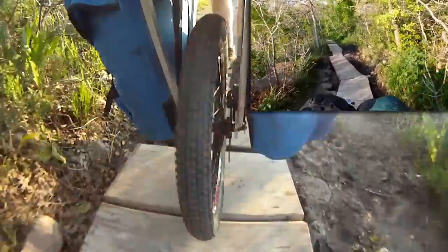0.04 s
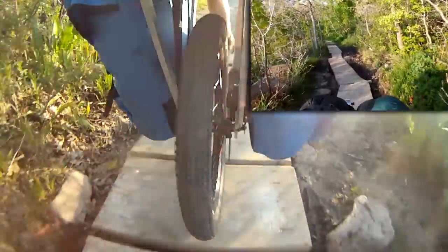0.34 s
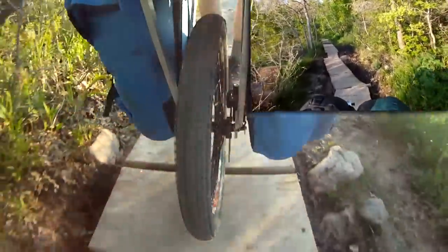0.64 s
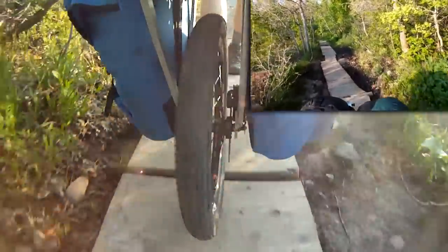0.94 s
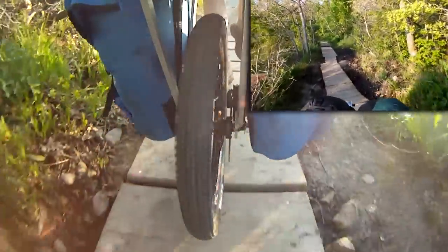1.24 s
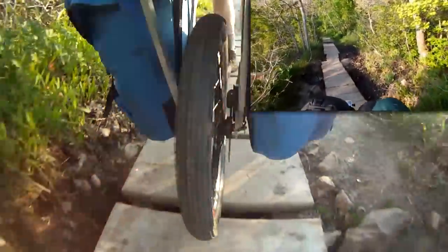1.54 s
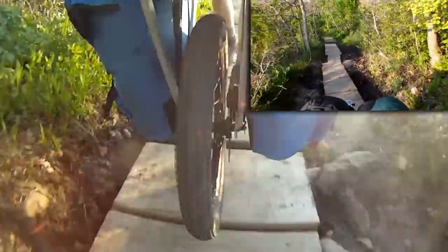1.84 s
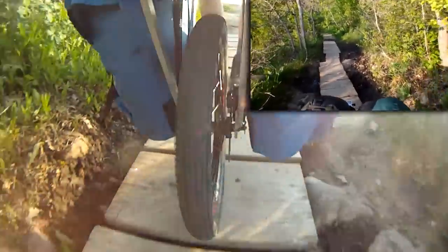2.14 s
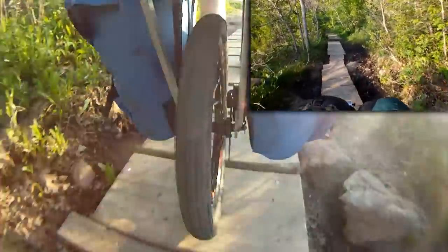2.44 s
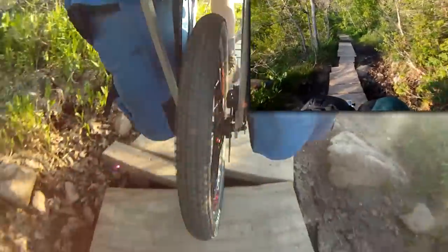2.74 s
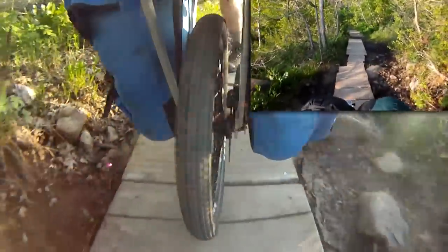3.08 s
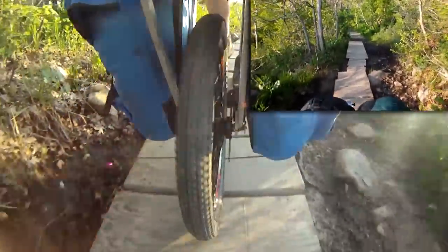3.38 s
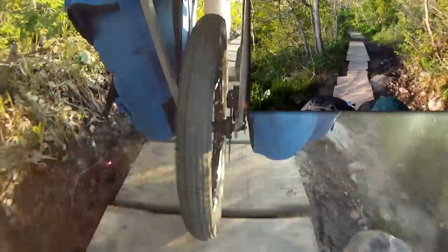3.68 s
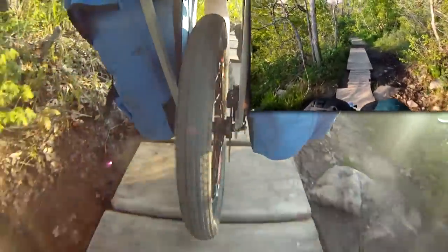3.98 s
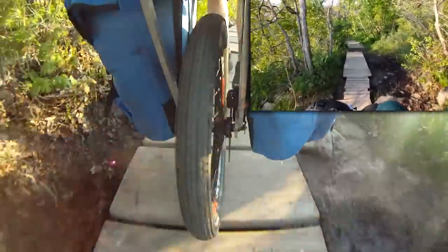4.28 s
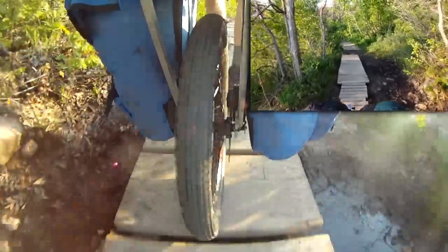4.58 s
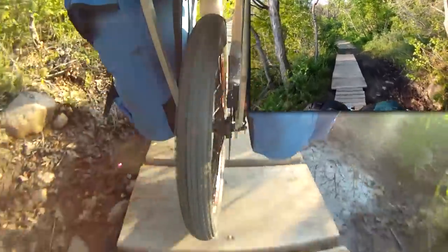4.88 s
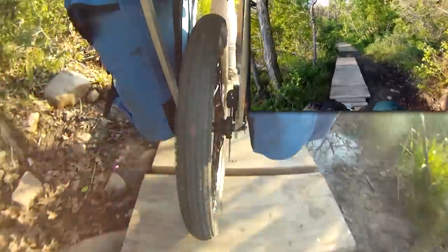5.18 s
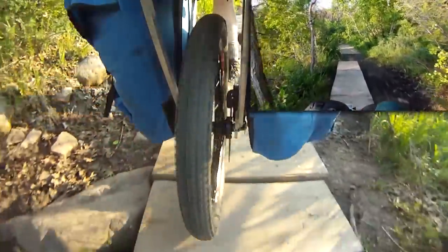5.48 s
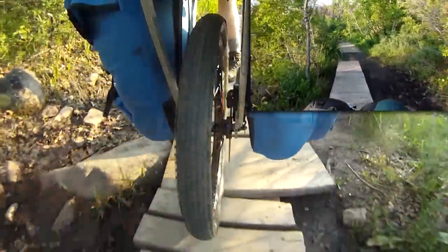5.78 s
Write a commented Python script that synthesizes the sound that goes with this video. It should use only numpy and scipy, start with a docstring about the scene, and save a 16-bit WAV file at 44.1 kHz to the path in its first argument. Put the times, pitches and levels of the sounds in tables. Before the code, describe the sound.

Close, irregular wooden thuds and loose-board clacks under a rolling cart wheel, over low wind rumble and faint birdsong in the woods.

```python
"""A loaded one-wheeled cart on a plank boardwalk in the woods, the microphone riding on its frame.
From the start air buffets the microphone and songbirds whistle over the hush of the forest. Close by,
with every stride, the deck rumbles, planks thud, grit ticks and the bags sway; now and then a loose
board clacks. From 2.4 to 4.7 s a bird trills farther off to the right. At 5.3 s comes the hardest
clack, and the cart rolls on."""
import sys
import numpy as np
from scipy import signal
from scipy.fft import rfft, irfft
from scipy.io import wavfile

SR = 44100
rng = np.random.default_rng(int(sys.argv[2]) if len(sys.argv) > 2 else 0)


def generate_wav(signal):
    """Clip the signal to [-1, 1] and save it as 16-bit WAV at the path in sys.argv[1]."""
    frames = np.transpose(np.atleast_2d(signal))
    scaled = np.clip(frames, -1, 1) * 32767
    pcm = np.round(scaled).astype(np.int16)
    wavfile.write(sys.argv[1], SR, pcm)


N = 265482
TIME = np.arange(N) / SR
BLOW = TIME[:SR // 3]  # time since a contact [s]

# each stride loads the deck and rocks the bags: (time [s], deck rumble [dB], bag rustle [dB])
STRIDES = [(.34, -54, -68), (1.121, -48, -60), (1.841, -52.5, -63.5), (2.62, -52, -72), (3.1, -52, -60.5),
           (3.94, -50.5, -64.5), (4.55, -51, -72), (5.33, -57, -65), (5.96, -51, -76)]
# rumble of the deck under the tyre: (frequency [Hz], level [dB])
DECK_SPECTRUM = [(50, 6.5), (95, 5.5), (230, 11.5), (450, 1.5), (700, -13), (1200, -17), (3000, -43)]
# a scrape on the boards: (frequency [Hz], level [dB])
SCRAPE_SPECTRUM = [(200, -8), (500, 6.5), (1000, 1), (1700, 2.5), (2700, -3), (3450, -8.5), (4300, -13.5),
                   (9000, -18.5)]
# likeness of left and right close to the microphone: (frequency [Hz], correlation [-1..1])
CART_LIKENESS = [(100, 0.55), (400, 0.71), (2000, 0.9), (5000, 0.52), (14000, 0.46)]


def plank_thuds(contact_hz=950, bumps_per_s=7, bump_hz=252, bump_t60=.037, gain_db=1):
    """Just below the microphone the tyre jolts a plank, which swings and rings; the deck shudders on."""
    # heavy dull blows: (time [s], level [dB], thud [Hz], t60 [s], jolt and ring against the thud [dB])
    blows = [(.342, -30.5, 449, 0.1, 3), (.425, -30, 217, 0.019, -4.5), (0.489, -25.5, 405, 0.017, -1),
             (1.124, -35, 168, .05, 9), (1.179, -35.5, 272, 0.082, -4), (1.226, -30, 257, 0.031, -5),
             (1.842, -26, 512, 0.035, 3), (1.946, -31.5, 239, 0.055, -7), (1.999, -21, 178, 0.033, -34),
             (2.033, -31.5, 410, 0.027, 8.5), (2.566, -39.5, 220, 0.023, -2),
             (2.6443, -30.5, 263.4, 0.12, 3), (2.773, -33.5, 250, .028, -5), (2.8469, -34, 395, 0.051, 5),
             (3.005, -40.5, 324, 0.024, -6), (3.174, -34, 288, 0.032, 1.5), (3.2008, -32.5, 265, 0.025, -1),
             (3.278, -26.5, 262, 0.022, -8), (3.8478, -39.5, 330, 0.03, -5),
             (3.9231, -25.5, 453, 0.075, -0.5), (3.9305, -29.5, 364, .02, -11),
             (3.9997, -31, 430, 0.025, 0), (4.062, -31, 435, 0.026, 1.5), (4.082, -38, 240, .04, -16),
             (4.5, -41, 324, 0.047, -8), (4.569, -29, 236, .032, -2.5), (4.7084, -30.5, 465, 0.057, 3.5),
             (4.839, -41, 336, 0.017, -4), (4.972, -37, 258, 0.034, 12), (5.314, -28.5, 490, 0.018, 1.5),
             (5.345, -22, 554, 0.026, -23), (5.417, -33.5, 403, 0.067, 3.5), (5.436, -34.5, 240, 0.037, -5),
             (5.622, -43, 370, 0.025, 2)]
    # modes of a plank resting on its sleepers: (frequency [Hz], level [dB], t60 [s])
    plank_modes = [(136, 8.5, 0.061), (189.2, 1, 0.15), (237.7, 0.5, 0.11), (322, -8.5, 0.19),
                   (369, -3, 0.052), (471.3, -1.5, 0.16), (536, -2, 0.075), (642, -15, 0.059),
                   (730, -14, 0.098), (1130, -17, 0.073)]
    bumps = [(s, db, bump_hz * 2 ** rng.uniform(-.46, .39), bump_t60, -3)
             for s, db in by_chance(bumps_per_s, db=-47.5, spread_db=1.5)]
    jolt = from_db(-6) * knock(hz=620, cycles=6.3, rise_s=.00087)
    out = np.zeros((2, N))
    for s, db, hz, t60, ring_db in blows + bumps:
        plank = jolt + peak_one(soften(ring(plank_modes, scatter_db=2.5, width=.33), contact_hz))
        thud = knock(hz, cycles=t60 * hz, rise_s=.8 / hz)
        shudder = soften(contact_noise(DECK_SPECTRUM) * dying(t60=.32), contact_hz)
        blow = from_db(ring_db) * plank + thud + from_db(-24) * shudder
        add(out, s, -from_db(db + gain_db) * peak_one(blow))
    return out * pan(left_db=-4.5)


def board_clacks(crack_t60=.047, rebound_s=.0035, trees_t60=.35):
    """Wood meets wood close by: a crack, a duller rebound, the board's ring, a faint echo off the trees."""
    # hard clacks of loose boards and the load:
    # (time [s], level [dB], knock [Hz], crack against the ring [dB], share of free ringing time [0..1])
    slaps = [(0.45, -38.5, 1900, -10, .54), (.491, -46, 695, -14, .4), (.517, -38.5, 1620, 3, .43),
             (.868, -42.5, 2050, -8, 0.34), (1.146, -37, 1490, 13, 0.53), (1.182, -40.5, 1490, 18, 1),
             (1.84, -42, 1110, -10, 0.47), (2.036, -36.5, 1770, 8, 1), (2.3443, -42, 1710, 6, 0.55),
             (2.677, -29, 1530, -3, 0.26), (2.773, -24, 1040, -0.5, 0.52), (2.906, -45, 1290, 7, .9),
             (3.278, -32, 1420, -18, 0.51), (4.512, -41.5, 1590, -16, 0.89), (4.666, -36, 1480, -5, 0.73),
             (4.705, -40, 1310, -13, 0.47), (4.904, -42, 1200, -10, 0.45), (5.211, -35, 1980, -14, 0.78),
             (5.3446, -14, 758, -2, 0.72)]
    # modes of a loose board: (frequency [Hz], level [dB], t60 [s])
    board_modes = [(259, -11, 0.15), (326, 9.5, 0.11), (455, 6, 0.042), (602, 1, 0.22), (655, -5, 0.22),
                   (830, 2, 0.085), (930, -18, 0.18), (1140, 6, 0.086), (1368, -3, 0.14), (1530, 0, 0.1),
                   (1740, -22, 0.042), (1730, 1.5, 0.088), (2080, 0.5, 0.12), (2546, -0.5, 0.073),
                   (3020, 4, 0.023), (3120, -31, 0.28), (3220, -13, 0.16)]
    # the crack of the contact: (frequency [Hz], level [dB])
    crack_spectrum = [(300, 0), (700, 0), (2200, 2.5), (3500, -6.5), (4800, -13), (7000, -19), (11000, -44),
                      (16000, -67)]
    echo = from_db(-32) * dying(trees_t60)
    out = np.zeros((2, N))
    for s, db, hz, crack_db, freedom in slaps:
        decay = dying(crack_t60 * freedom)
        board = peak_one(ring(board_modes, scatter_db=1, width=.15, freedom=freedom))
        crack = peak_one(contact_noise(crack_spectrum) * (decay + echo))
        rebound = peak_one(contact_noise(SCRAPE_SPECTRUM) * decay)
        blow = board + from_db(crack_db) * crack + from_db(-4) * knock(hz, cycles=11, rise_s=.0012)
        add(out, s, from_db(db) * peak_one(blow))
        # the looser the board, the harder it rebounds
        add(out, s + rebound_s, from_db(db - 4) * freedom ** 2 * rebound)
    return out * pan(left_db=-4)


def rolling_tyre():
    """With each stride the tyre drums on the wood's grain and scrapes a little, near and to the right."""
    # short scrapes: (middle [s], length [s], level [dB], rasp against the scrape [dB])
    scrapes = [(0.472, 0.093, -54, -16), (2.664, 0.024, -52, -16), (2.917, 0.034, -48, -22),
               (3.103, 0.06, -60, -25), (3.334, .049, -56, -29), (4.016, 0.27, -61, -23),
               (4.753, 0.086, -61.5, -20), (5.332, 0.0093, -48, -22), (5.611, 0.02, -50.5, -25),
               (5.942, 0.058, -47.5, -4)]
    # the dry rasp of a scrape: (frequency [Hz], level [dB])
    rasp_spectrum = [(200, -42), (2800, -25), (3450, 2), (4100, -23), (9000, -38)]
    load = sum(from_db(db) * stride(s) for s, db, _ in STRIDES)
    scraping = from_db(-17) * load + strokes((s, length, db) for s, length, db, _ in scrapes)
    rasping = strokes((s, length, db + rasp_db) for s, length, db, rasp_db in scrapes)
    rumble = from_db(-2) * load * rubbing(DECK_SPECTRUM, grain_db=5.5, grains_per_s=70)
    scrape = scraping * rubbing(SCRAPE_SPECTRUM, grain_db=4, grains_per_s=320)
    rasp = rasping * rubbing(rasp_spectrum, grain_db=5, grains_per_s=350)
    return rumble * pan(left_db=-5.5) + (scrape + rasp) * pan(left_db=-3.5)


def grit_ticks(crumbs_per_s=10, gain_db=1):
    """A grain of grit snaps under the tyre and its crumbs scatter."""
    # the larger grains: (time [s], level [dB])
    grains = [(.424, -44.5), (.5172, -35), (.6928, -43), (1.1812, -34), (2.0792, -39.5), (2.236, -43),
              (2.3441, -34.5), (2.7726, -25.5), (2.8833, -37), (2.9032, -34), (2.9732, -49), (3.1053, -37),
              (3.2223, -37.5), (3.29, -37), (3.5962, -43), (4.169, -39.5), (4.6658, -36.5), (5.2121, -37),
              (5.3444, -26.5)]
    # the snap of a grain: (frequency [Hz], level [dB])
    snap_spectrum = [(400, 1), (1200, 3), (2500, -10.5), (4500, -8), (7000, -6), (11000, -8.5),
                     (16000, -14)]
    decay = dying(t60=.018) + from_db(-18) * dying(t60=.16)
    out = np.zeros((2, N))
    for s, db in [*grains, *by_chance(crumbs_per_s, db=-48.5, spread_db=1)]:
        snap = contact_noise(snap_spectrum) * decay
        add(out, s, from_db(db + gain_db) * peak_one(snap))
    return out * pan(left_db=-1.5)


def bag_rustle(crumple_db=3.5, gain_db=-2.5):
    """Beside the microphone the bags sway with each stride; their fabric rubs and crumples."""
    # the bags slip on the frame: (middle [s], length [s], level [dB])
    slips = [(1.338, 0.014, -53), (1.758, 0.027, -53), (1.915, 0.021, -54.5), (1.97, .025, -56),
             (2.95, 0.14, -54), (3.035, 0.077, -49.5), (3.11, 0.042, -46.5), (3.172, 0.03, -48),
             (4.738, 0.018, -56), (5.352, 0.024, -49), (5.63, 0.14, -68), (5.94, 0.045, -53.5)]
    # rubbing fabric: (frequency [Hz], level [dB])
    fabric_spectrum = [(700, 5.5), (2000, 1), (4000, -4.5), (7000, -1.5), (10500, -1), (13000, -8),
                       (16000, -14)]
    sway = sum(from_db(db) * stride(s) for s, _, db in STRIDES)
    crumple = from_db(crumple_db * np.clip(drift(per_s=45), -2, 2))
    fabric = rubbing(fabric_spectrum, grain_db=3.5, grains_per_s=970)
    return from_db(gain_db) * (sway + strokes(slips)) * crumple * fabric * pan(left_db=.5)


def wind_buffet(gust_db=1, veer_db=1.5, gain_db=6):
    """The breeze buffets the microphone in gusts and veers from side to side."""
    # strength of the air on the microphone: (time [s], level [dB])
    breeze = [(0, -36), (.2, -39.5), (.5, -32.5), (.8, -36.5), (1.05, -38), (1.35, -31.5), (1.6, -38.5),
              (1.9, -34), (2.35, -40), (2.7, -34.5), (3.0, -30.5), (3.45, -38), (3.7, -43), (4.25, -39),
              (4.8, -41), (5.6, -36), (6.0, -39.5)]
    # the low buffeting: (frequency [Hz], level [dB])
    spectrum = [(2, -28), (5.5, 5.5), (10, 4.5), (21, -5), (30, -13.5), (43, -6), (60, -18.5), (100, -26),
                (160, -42.5), (300, -62), (700, -100)]
    # likeness of left and right: (frequency [Hz], correlation [-1..1])
    likeness = [(10, -0.28), (50, -1), (120, -0.066), (400, -0.12)]
    gusts = from_db(gust_db * drift(per_s=7))
    veer = from_db(veer_db * drift(per_s=3) * np.array([[1], [-1]]) / 2)
    return from_db(gain_db) * level(breeze) * gusts * veer * noise(spectrum, likeness) * pan(left_db=-3)


def songbirds(glide_at_middle=.62, waver_per_glide=.157, gain_db=-6):
    """Birds whistle phrases in the trees ahead, rougher where they slur."""
    # whistled notes: (time [s], length [s], start pitch [Hz], end pitch [Hz], level [dB])
    notes = [(0.169, 0.023, 2300, 2420, -54.5), (0.258, .06, 3050, 3600, -63), (.66, 0.06, 2350, 2950, -61),
             (.72, 0.045, 2800, 3620, -61), (0.903, .05, 3420, 3640, -63), (0.944, 0.12, 2930, 3510, -61),
             (1.208, .04, 3420, 3740, -59), (1.529, 0.071, 3080, 3570, -60),
             (1.688, 0.126, 3074, 3030, -63.5), (1.81, 0.063, 3030, 2960, -58.5),
             (2.1, 0.12, 2890, 2824, -58.5), (4.797, 0.1, 3510, 3450, -63.5), (4.919, .1, 3440, 3354, -61),
             (5.162, 0.057, 3690, 3450, -62), (5.21, 0.06, 3160, 2840, -58.5),
             (5.39, 0.066, 3190, 3090, -53), (5.765, 0.053, 2930, 3060, -60)]
    song = np.zeros((2, N))
    for s, length, start_hz, end_hz, db in notes:
        pitches = [start_hz, start_hz + glide_at_middle * (end_hz - start_hz), end_hz]
        waver = .0022 + waver_per_glide * np.ptp(pitches) / np.mean(pitches)
        add(song, s, from_db(db + gain_db) * whistle(length, pitches, waver, flutter_db=-1))
    return woods(song, t60=.31, direct_db=-1)


def trilling_bird(span_s=(2.447, 4.66), period_s=.0485, sweep_s=.031, sweep_hz=(3500, 4750, 5950)):
    """Farther off to the right one bird trills in quick upward sweeps, no two alike."""
    # loudness of the trill: (time [s], level [dB])
    loudness = [(2.4, -73), (2.65, -63), (3.0, -58.5), (3.55, -57.5), (3.9, -59), (4.2, -63.5),
                (4.47, -58.5), (4.62, -61), (4.68, -70)]
    trill = np.zeros((2, N))
    for s in np.arange(*span_s, period_s):
        pitches = np.array(sweep_hz) * (1 + .02 * rng.standard_normal(3))
        add(trill, s, whistle(sweep_s, pitches, waver=.03, flutter_db=2))
    trill *= from_db(-4) * level(loudness) * pan(left_db=-6)
    return woods(trill, t60=.12, direct_db=-9)


def forest_hush(gain_db=-57.5):
    """The steady hush of the forest, far off and all around."""
    # colour of the hush: (frequency [Hz], level [dB])
    spectrum = [(88, -60), (150, -5), (254, -1.5), (587, -9.5), (2120, -13.5), (4450, -22), (10300, -25.5),
                (14900, -32.5), (15800, -33)]
    # likeness of left and right: (frequency [Hz], correlation [-1..1])
    likeness = [(130, 0.95), (300, 0.46), (700, 0.61), (1500, 0.75), (3100, 0.66), (6500, 0.26),
                (15000, 0.03)]
    return from_db(gain_db) * noise(spectrum, likeness) * pan(left_db=.6)


def stride(s, attack_s=.07, hold_s=.2, release_db_per_s=45):
    """Gain over one stride: weight comes on, stays, and is taken off."""
    rise = np.clip((TIME - s) / attack_s + 1, 0, 1)
    return rise * from_db(-release_db_per_s * np.maximum(TIME - s - hold_s, 0))


def by_chance(per_s, db, spread_db):
    """(time [s], level [dB]) of small contacts, crowding where the strides put weight on the deck."""
    weight = np.cumsum(np.sqrt(sum(stride(s) for s, *_ in STRIDES)))
    count = int(per_s * N / SR)
    place, size = rng.random((count, 2)).T
    times = np.interp((np.arange(count) + place) / count, weight / weight[-1], TIME)
    return zip(times, db + spread_db * (2 * size - 1))


def ring(modes, scatter_db, width, freedom=1):
    """Each blow lands elsewhere, so modes vary in strength, sign and direction; weight damps the wood."""
    out = 0
    for hz, db, t60 in modes:
        strength, detune, skew = rng.standard_normal(3)
        phase = 2 * np.pi * hz * (1 + .021 * detune) * BLOW + width * skew * np.array([[1], [-1]])
        gain = rng.choice([-1, 1]) * from_db(db + scatter_db * strength)
        out = out + gain * np.sin(phase) * dying(t60 * freedom)
    return out


def knock(hz, cycles, rise_s):
    """A damped swing that builds up while the contact lasts."""
    rise = 1 - np.exp(-(BLOW / rise_s) ** 2)
    return peak_one(np.sin(2 * np.pi * hz * BLOW) * dying(cycles / hz) * rise)


def soften(x, hz):
    """A soft contact passes little above its corner."""
    return signal.sosfilt(signal.butter(2, hz, fs=SR, output="sos"), x)


def contact_noise(spectrum):
    """A short stretch of close noise for one contact."""
    return noise(spectrum, CART_LIKENESS, size=len(BLOW))


def rubbing(spectrum, grain_db, grains_per_s):
    """Friction noise that catches and lets go in tiny grains."""
    grains = from_db(grain_db * np.clip(drift(grains_per_s), -2.5, 2.5))
    return noise(spectrum, CART_LIKENESS) * rms_one(grains)


def whistle(length, pitches, waver, flutter_db):
    """A wavering near-sine note glides through three pitches and flutters on its way through the leaves."""
    along = np.linspace(0, 1, int(length * SR))
    wobble = np.interp(along, np.linspace(0, 1, 28), rng.standard_normal(28))
    flutter = np.interp(along, np.linspace(0, 1, 8), rng.standard_normal(8))
    glide_hz = np.polyval(np.polyfit([0, .5, 1], pitches, 2), along)
    phase = 2 * np.pi * np.cumsum(glide_hz * (1 + waver * wobble)) / SR
    swell = rms_one(np.sqrt(np.abs(np.sin(np.pi * along))) * from_db(flutter_db * flutter))
    return swell * np.sqrt(2) * np.sin(phase)


def woods(x, t60, direct_db):
    """Trunks and leaves scatter a far sound into a soft tail, different on each side."""
    tail = rng.standard_normal((2, len(BLOW))) * dying(t60)
    tail /= np.sqrt(np.sum(tail ** 2, axis=1, keepdims=True))
    return from_db(direct_db) * x + signal.fftconvolve(x, tail, axes=1)[:, :N]


def noise(spectrum, likeness, size=N):
    """Stereo noise with a given colour and left-right likeness; its middle has rms 1."""
    hz = np.arange(size // 2 + 1) * SR / size
    alike = np.clip(at_hz(likeness, hz), -.98, .98)
    white = rfft(rng.standard_normal((2, size)))
    mid, side = irfft(white * from_db(at_hz(spectrum, hz)) * np.sqrt([1 + alike, 1 - alike]), size)
    return np.array([mid + side, mid - side]) / mid.std()


def drift(per_s):
    """A random wander between values of spread 1."""
    knots = rng.standard_normal(N // 20)
    return np.interp(TIME * per_s, np.arange(len(knots)), knots)


def dying(t60):
    """Decay after a contact, 60 dB down in t60 seconds."""
    return from_db(-60 * BLOW / t60)


def strokes(rows):
    """Gain over time of smooth swells, from (middle [s], length [s], level [dB]) rows."""
    return sum(from_db(db) * np.exp(-(2 * (TIME - s) / length) ** 2) for s, length, db in rows)


def level(rows):
    """Gain over time from (time [s], level [dB]) rows."""
    return from_db(np.interp(TIME, *np.transpose(rows)))


def at_hz(points, hz):
    """Read a table on a log-frequency axis."""
    known_hz, values = np.transpose(points)
    return np.interp(np.log(hz + 1e-3), np.log(known_hz), values)


def from_db(db):
    """Decibels to gain."""
    return 10 ** (np.asarray(db) / 20)


def rms_one(x):
    """Scale to rms 1."""
    return x / np.sqrt(np.mean(x ** 2) + 1e-20)


def peak_one(x):
    """Scale to peak 1."""
    return x / (np.abs(x).max() + 1e-20)


def pan(left_db):
    """Left and right gains for a level difference; negative lies to the right."""
    return from_db(np.array([[left_db], [-left_db]]) / 2)


def add(out, s, sound):
    """Mix a short sound in at a time."""
    start = int(np.clip(round(s * SR), 0, N - 1))
    out[:, start:start + sound.shape[-1]] += sound[..., :N - start]


def scene():
    """The cart and planks up close, air on the microphone, birds and forest beyond."""
    cart = plank_thuds() + board_clacks() + rolling_tyre() + grit_ticks() + bag_rustle()
    return cart + wind_buffet() + songbirds() + trilling_bird() + forest_hush()


def record(dry, cutoff_hz=15900):
    """The highest treble is cut steeply."""
    return signal.sosfilt(signal.ellip(10, .1, 80, cutoff_hz, fs=SR, output="sos"), dry)


dry = scene()
out = record(dry)
generate_wav(out)
```